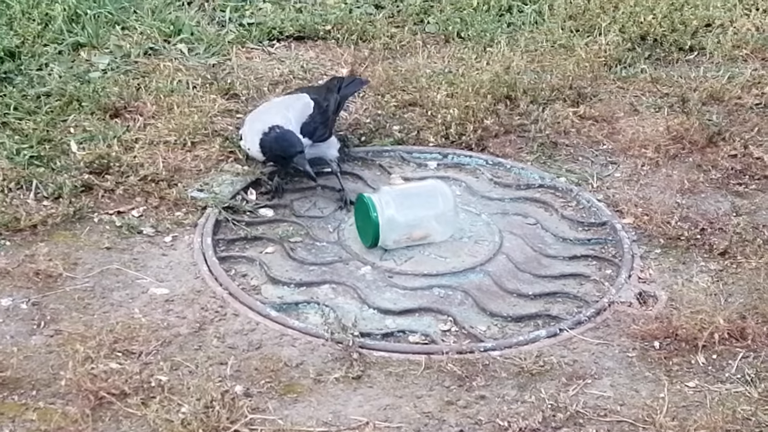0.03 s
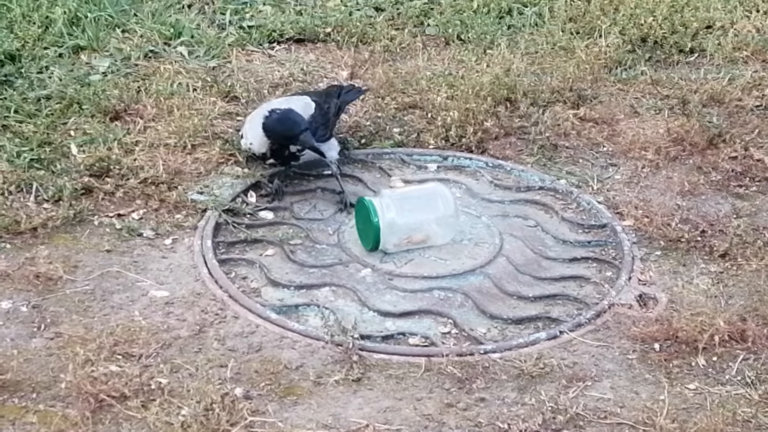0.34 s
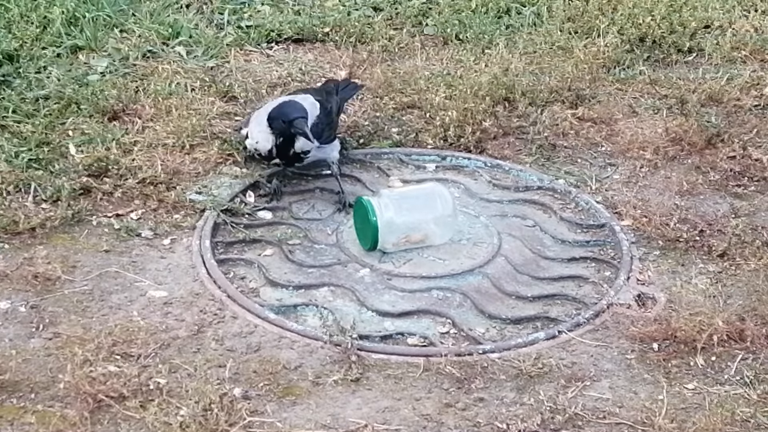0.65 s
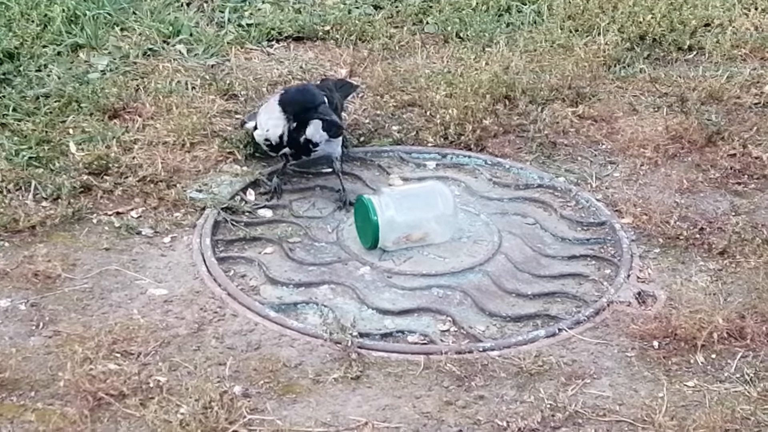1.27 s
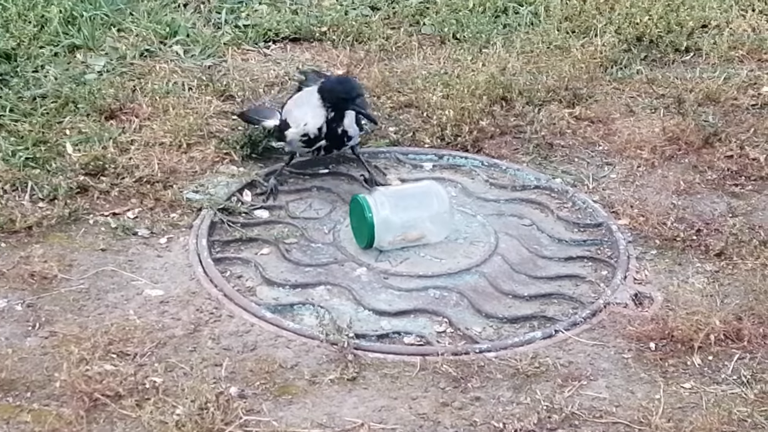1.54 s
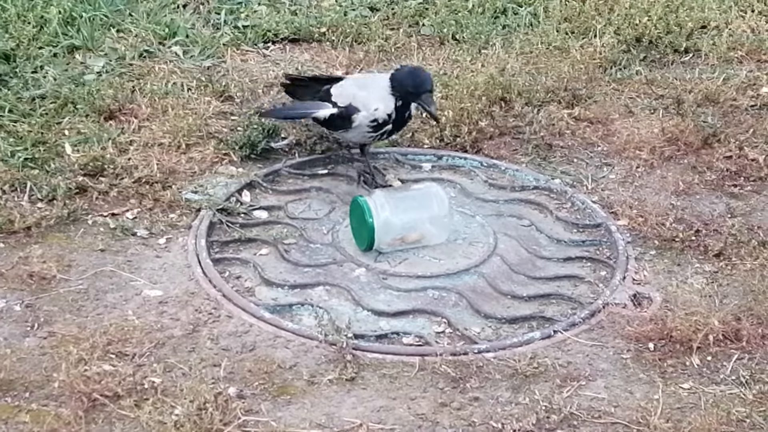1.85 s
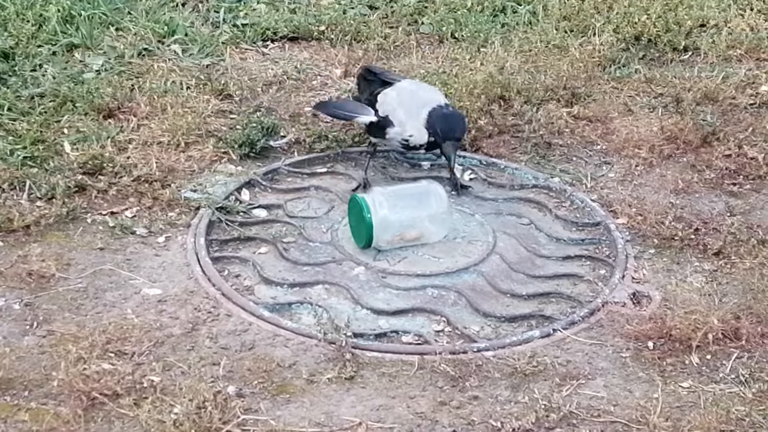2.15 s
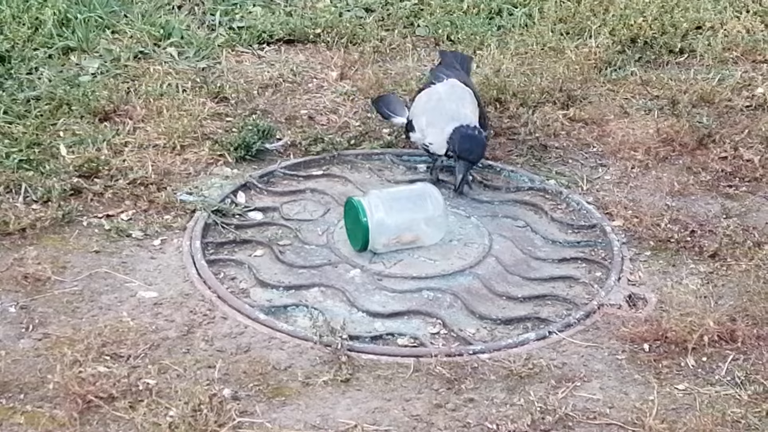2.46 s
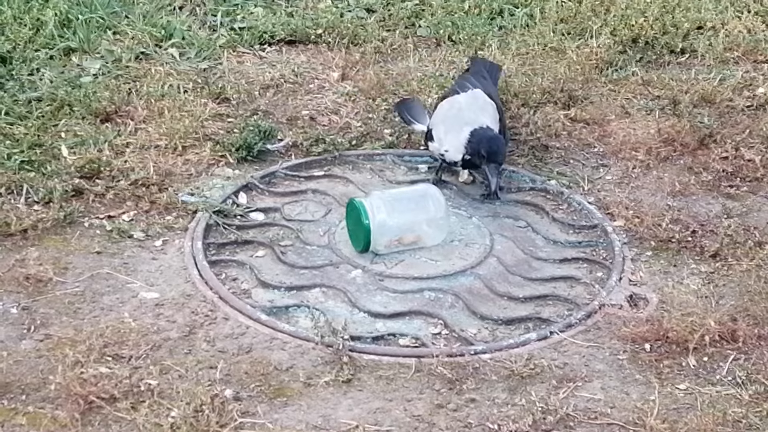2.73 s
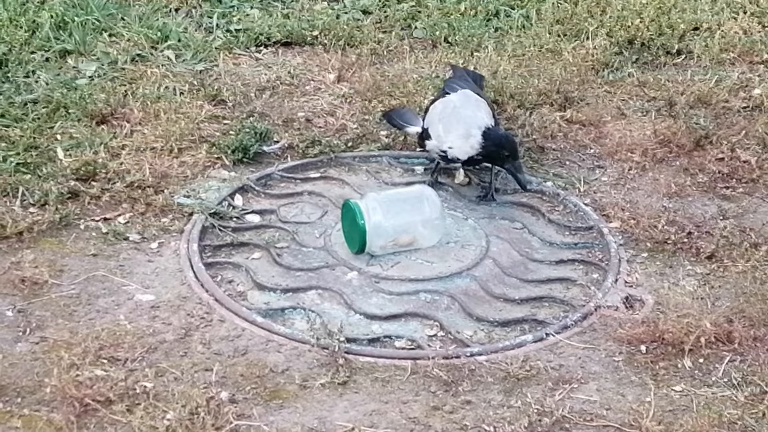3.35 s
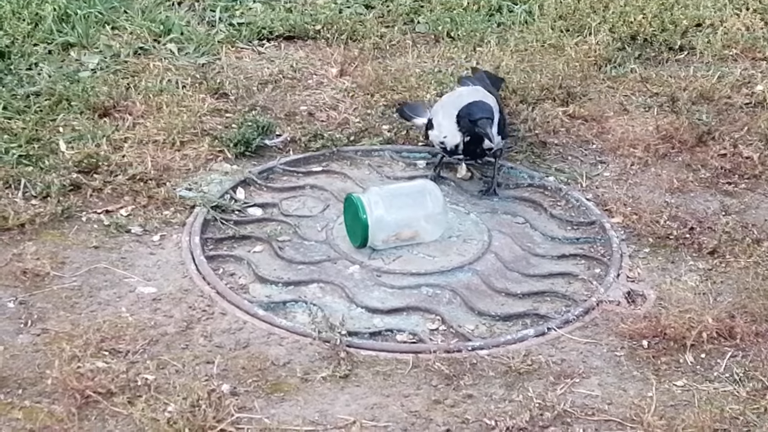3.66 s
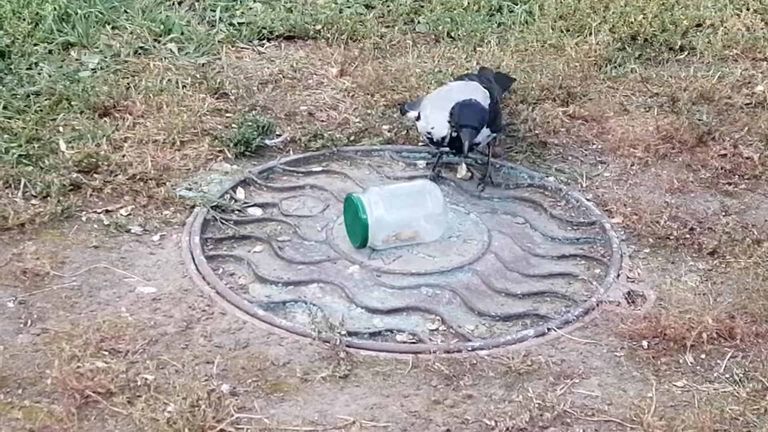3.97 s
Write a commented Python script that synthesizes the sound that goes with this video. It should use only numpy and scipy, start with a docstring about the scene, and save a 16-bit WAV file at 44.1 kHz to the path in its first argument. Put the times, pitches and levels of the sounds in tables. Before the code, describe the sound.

Distant traffic rumbles steadily outdoors, with low engines droning and fading halfway through. Close to the microphone, a crow walks in dry grass, making a soft rustle, a quick run of small crackles, then a few faint steps.

```python
"""Crow in dry grass, distant traffic

Far roads give a low rumble, tyre roar and a hum of treads, all shaped noise.
Two far engines drone in low harmonics, lose speed and fade within about two seconds.
Close by a crow walks in dry grass: a soft hissing rustle with a faint whistle in it,
a quick run of dry crackles, then a few faint steps."""
import sys
import numpy as np
from scipy import signal
from scipy.fft import rfft, irfft
from scipy.io import wavfile
from scipy.ndimage import uniform_filter1d

SR = 44100
rng = np.random.default_rng(int(sys.argv[2]) if len(sys.argv) > 2 else 0)


def persist_wave(psi):
    """Save psi, clipped to +-1, as 16-bit WAV."""
    counts = np.round(np.clip(psi, -1, 1) * 32767).astype(np.int16)
    wavfile.write(sys.argv[1], SR, np.atleast_2d(counts).T)


N = 176400
TIME_S, BINS_HZ = np.arange(N) / SR, np.fft.rfftfreq(N, 1 / SR)


def amp(db):
    """Decibels to gain."""
    return 10 ** (np.asarray(db) / 20)


def unit(x):
    """Scale to rms 1."""
    return x / np.sqrt(np.mean(x ** 2) + 1e-20)


def at_hz(points, hz):
    """Read a table on a log-frequency axis."""
    freq_hz, value = np.transpose(points)
    return np.interp(np.log(hz + 1), np.log(freq_hz + 1), value)


def in_time(table):
    """One per-sample curve for each column after time_s."""
    time_s, *columns = np.transpose(table)
    return [np.interp(TIME_S, time_s, column) for column in columns]


def pan(db):
    """Stereo gains: +db left, -db right."""
    return amp(np.array([[db], [-db]]))


def drift(rate_hz):
    """Random motion below rate_hz, rms 1."""
    white = rfft(rng.standard_normal(N))
    return unit(irfft(white * (BINS_HZ > 0) / (1 + (BINS_HZ / rate_hz) ** 4), N))


def colour(x, spectrum):
    """Filter by a spectral shape, keeping the power of white noise."""
    return irfft(rfft(x) * unit(amp(at_hz(spectrum, BINS_HZ))), N)


def narrow_noise(centre_hz, half_width_hz):
    """Noise band around a steady or gliding pitch."""
    phase = 2 * np.pi * np.cumsum(centre_hz * np.ones(N)) / SR
    return drift(half_width_hz) * np.cos(phase) + drift(half_width_hz) * np.sin(phase)


def traffic(level_db=-39, patch_db=0.96, swell_db=0.5, crossover_hz=314):
    """Far roads: a steady rumble under tyre roar that slowly recedes."""
    # road noise shape: freq_hz, relative_db
    spectrum = [(12,-41),(20,-20),(32,-13.5),(48,-6.5),(65,-3.5),(97,2.5),(135,-4.5),(160,-7),(245,-7),(300,-16),(350,-20.5),(500,-20.5),(750,-21),(1150,-21),(1400,-26),(2150,-30.5),(3300,-40.5),(4100,-42.5),(6200,-51),(7700,-54),(9300,-65),(10200,-72),(15000,-80)]
    # tyre roar: time_s, gain_db
    roar_gain = [(0,2.5),(.45,3),(1.0,2.5),(1.8,2),(2.3,1.7),(2.7,0.86),(3.1,1.5),(3.6,0),(4,0.1)]
    # likeness of the channels: freq_hz, coherence
    likeness = [(25,.72),(60,0.86),(180,0.98),(300,0.81),(560,0.75),(1000,0.21),(1700,.5),(3000,0.23),(6000,0.26),(10000,.3)]
    # balance: freq_hz, left_minus_right_db
    balance = [(60, 5.5), (100, -2), (180, -2.5), (320, -2.5), (560, 1), (980, 1.5), (1710, 2), (2980, 4.5),
               (5210, 4), (9110, -6)]
    # phase between channels: freq_hz, left_lead_rad
    lead = [(20,0),(400,0),(690,-.4),(950,-.5),(1290,-3.0),(1640,-2.9),(2500,.4),(2930,3.6),(3530,4.3),(5200,8.9),(7000,10)]
    frames, hz = N // 512 + 5, np.fft.rfftfreq(2048, 1 / SR)
    left_re, left_im, apart_re, apart_im, patches = rng.standard_normal((5, frames, len(hz)))
    patches = uniform_filter1d(patches, size=10, axis=0)  # smooth in time
    patches = unit(uniform_filter1d(patches, size=16, axis=1))  # and in frequency
    coherence, lead_rad = at_hz(likeness, hz), at_hz(lead, hz)
    left, apart = left_re + 1j * left_im, apart_re + 1j * apart_im
    right = (coherence * left + np.sqrt(1 - coherence ** 2) * apart) * np.exp(-1j * lead_rad)
    side = amp(at_hz(balance, hz) / 2)
    spectra = np.array([left * side, right / side]) * amp(at_hz(spectrum, hz) + patch_db * patches)
    spectra /= np.sqrt((1 + coherence * np.cos(lead_rad)) / 2)  # offset cancellation in the mono sum
    road = unit(signal.istft(spectra.swapaxes(1, 2), nperseg=2048, noverlap=1536)[1][:, :N])
    roar = irfft(rfft(road) / (1 + (crossover_hz / (BINS_HZ + 1)) ** 4), N)
    rumble = road - roar
    return amp(level_db) * (rumble + roar * amp(in_time(roar_gain)[0] + swell_db * drift(12)))


def tread_hum(half_width_hz=110, coherence=0.49):
    """Tyre treads hum near 1 kHz, sinking as the traffic slows."""
    # hum band: time_s, centre_hz, level_db
    band = [(0,1020,-51),(.45,1020,-50.5),(1.0,990,-51),(1.5,980,-49),(2.2,930,-51),(3.0,920,-53.5),(4,900,-56)]
    centre_hz, level_db = in_time(band)
    shared, left, right = [narrow_noise(centre_hz, half_width_hz) for _ in range(3)]
    hum = np.sqrt(coherence) * shared + np.sqrt(1 - coherence) * np.array([left, right])
    return amp(level_db) * pan(1.7) * hum


def engine(base_hz, orders, end_s, waver=0.0053, flutter_db=0.67, release_db_per_s=141):
    """Harmonics (order, level_db) of a wavering engine speed, dying away after end_s."""
    turns = np.cumsum(base_hz * (1 + waver * drift(12))) / SR
    fade_db = -release_db_per_s * np.maximum(TIME_S - end_s, 0)
    drone = np.zeros(N)
    for order, level_db in orders:
        peak = np.sqrt(2) * amp(level_db + fade_db + flutter_db * drift(6))
        drone += peak * np.sin(2 * np.pi * (order * turns + rng.random()))
    return drone


def vehicles():
    """Two far engines to the left, over low exhaust noise."""
    # main engine speed: time_s, cycle_hz
    speed = [(0,55.68),(.35,55.43),(.55,55.16),(.7,52.95),(.9,50.83),(1.35,50.66),(1.62,49.6),(1.8,46.47),(2.0,41.94)]
    # its firing tone, order 2: time_s, level_db
    firing = [(0,-30.5),(.08,-27),(.19,-38.5),(.35,-32.5),(.5,-25.5),(.68,-28),(.73,-45.5),(.86,-32.5),(.99,-28.5),(1.09,-25.5),(1.17,-33.5),(1.32,-26.5),(1.52,-23.5),(1.64,-24),(1.73,-28.5),(1.83,-28.5),(1.89,-41),(1.96,-38.5),(2.05,-58)]
    # its overtones: time_s, order3_db, order4_db, order5_db
    overtones = [(0,-59,-40,-57),(.3,-56,-37.5,-59),(.55,-54,-51,-62),(.75,-41,-44,-56),(.95,-39.5,-46,-62),(1.3,-35.5,-41.5,-50.5),(1.7,-37.5,-43.5,-46.5),(1.9,-42.5,-46,-56),(2.1,-65,-62,-56)]
    # second engine: time_s, firing_hz, firing_db, third_harmonic_db
    second_run = [(0,74,-35,-42.5),(.12,76.5,-48,-41),(.26,79.9,-34,-43),(.48,81.75,-36.5,-45),(.7,82.06,-33,-55),(.84,79.9,-33.5,-52.5),(.98,76,-60,-60)]
    # exhaust shape: freq_hz, relative_db
    exhaust_spectrum = [(15,-19.5),(35,-9.5),(55,1.5),(72,-5.5),(120,-7.5),(190,-8.5),(260,-14.5),(340,-33.5),(600,-73.5)]
    # exhaust envelope: time_s, level_db
    exhaust_level = [(0,-39.5),(.6,-43.5),(1.2,-42),(1.75,-35.5),(1.92,-47),(2.1,-68),(4,-85)]
    main_orders = enumerate(in_time(firing) + in_time(overtones), start=2)
    main = engine(in_time(speed)[0], main_orders, end_s=1.98)
    exhaust = colour(rng.standard_normal(N), exhaust_spectrum) * amp(in_time(exhaust_level)[0])
    firing_hz, firing_db, third_db = in_time(second_run)
    second = engine(firing_hz, [(1, firing_db), (3, third_db)], end_s=0.98)
    return pan(2.5) * (main + second + exhaust)


def grass_rustle(grain_db=1.0, flicker_db=1.5):
    """Dry blades brush together in a fine, close hiss."""
    # hiss shape: freq_hz, relative_db
    spectrum = [(500,-23),(1500,-4.5),(2500,8.5),(3600,-2.5),(5700,1.5),(6800,-4),(7450,-3),(8300,-11),(9200,-15),(10200,-20.5),(15000,-26.5)]
    # envelope: time_s, level_db
    level = [(0,-61.5),(.25,-57),(.5,-55.5),(.66,-55),(.85,-55.5),(1.1,-60.5),(1.3,-67.5),(1.7,-69),(2.0,-60.5),(2.3,-68.5),(3.0,-78),(4,-65.5)]
    # balance: freq_hz, left_minus_right_db
    balance = [(1500,1.5),(4000,2),(6000,0),(7400,-2),(8500,-13),(10000,-15),(15000,-1.5)]
    grains = unit(rng.standard_normal((2, N)) * amp(grain_db * drift(900) + flicker_db * drift(25)))
    side = amp(at_hz(balance, BINS_HZ) / 2)
    hiss = irfft(rfft(colour(grains, spectrum)) * np.array([side, 1 / side]), N)
    return hiss * amp(in_time(level)[0])


def whistle(pitch_hz=7340, half_width_hz=64, flicker_db=3):
    """A faint, fuzzy high tone that comes and goes in the rustle."""
    # envelope: time_s, level_db
    level = [(0,-85),(.05,-67),(.12,-88),(.42,-88),(.46,-68),(.51,-80),(.55,-67),(.62,-79),(.67,-95),(.8,-120)]
    envelope = amp(in_time(level)[0] + flicker_db * drift(30))
    return pan(-2.5) * envelope * narrow_noise(pitch_hz, half_width_hz)


def grass_crackles(rise_s=0.0058, decay_s=0.008, grain_db=3, snap_db=3.0):
    """Dry grass under the crow's feet: clumps of tiny snaps, each a bright ring and a lower rasp."""
    # crackles: start_s, relative_db, rasp_offset_db, hold_s
    clumps = [(0.726,-48,1.5,.004),(0.765,-50,-2,0.0076),(0.79,-48,0.5,0.0067),(0.805,-56,4,.003),(0.844,-63,2,.003),(.860,-56.5,1,.003),(0.867,-55,6,.003),(.909,-44.5,2.5,0.0043),(.937,-50,5,0.0061),
              (0.978,-49,1,0.0037),(1.003,-49,1.5,0.011),(1.045,-55,-6,0.015),(1.077,-46.5,-21,0.0068),(1.113,-52,-6,0.013),(1.138,-53.5,-7,0.015),
              (1.214,-53,-6,0.0026),(1.657,-62,-7,0.0029),(1.728,-60,-2,.003),(1.795,-62.5,-3,0.007),(1.942,-54,-13,.003),(1.965,-57.5,-4,.006),(2.043,-66,-5,.004)]
    # bright band: freq_hz, relative_db
    ring_spectrum = [(3000,-34),(6000,-4.5),(7100,-2.5),(7700,3.5),(8700,-2),(9900,-24),(13000,-21),(14100,-20.5),(15000,-33)]
    # lower band: freq_hz, relative_db
    rasp_spectrum = [(1200,-34.5),(3000,-1.5),(4500,1),(6100,-1),(7200,-19),(10000,-30.5),(15000,-39.5)]
    ring_envelope, rasp_envelope = np.zeros((2, N))
    for start_s, relative_db, rasp_offset_db, hold_s in clumps:
        attack = np.clip((TIME_S - start_s) / rise_s + 0.5, 0, 1)
        decay = np.exp(-np.maximum(TIME_S - start_s - hold_s, 0) / decay_s)
        ring_envelope += amp(relative_db) * attack * decay
        rasp_envelope += amp(relative_db + rasp_offset_db) * attack * decay
    noise = rng.standard_normal((2, 2, N))  # band, channel, sample
    snaps = unit(noise * amp(grain_db * drift(1500) + snap_db * rng.standard_normal(N)))
    ring = colour(snaps[0] * ring_envelope, ring_spectrum)
    rasp = colour(snaps[1] * rasp_envelope, rasp_spectrum)
    return pan(-2.5) * ring + pan(0.3) * rasp


def scene(crackle_gain_db=-5.0):
    """Far traffic behind the small sounds in the grass."""
    far = traffic() + tread_hum() + vehicles()
    near = grass_rustle() + whistle() + amp(crackle_gain_db) * grass_crackles()
    return far + near


def record(dry):
    """Steep low-pass at 15.1 kHz."""
    lowpass = signal.firwin(511, 15100, window=("kaiser", 9), fs=SR)
    return signal.oaconvolve(dry, lowpass[None], "same")


dry = scene()
out = record(dry)
persist_wave(out)
```